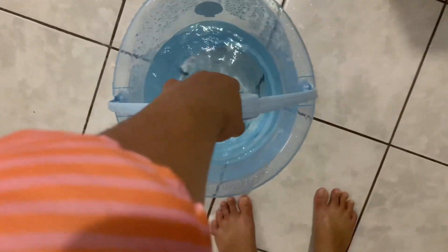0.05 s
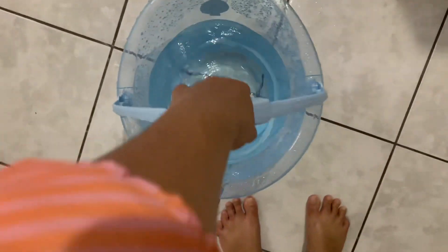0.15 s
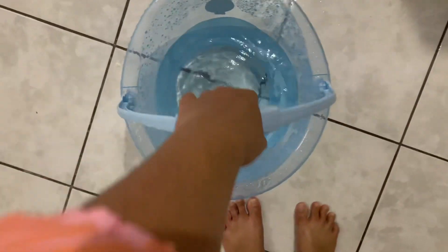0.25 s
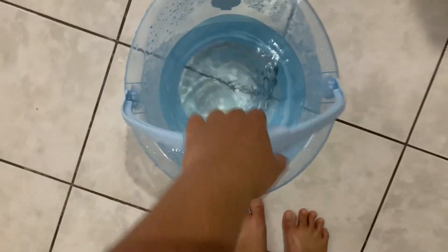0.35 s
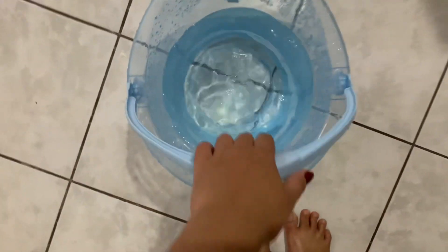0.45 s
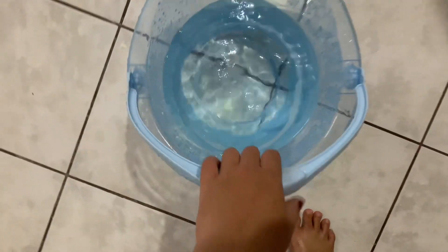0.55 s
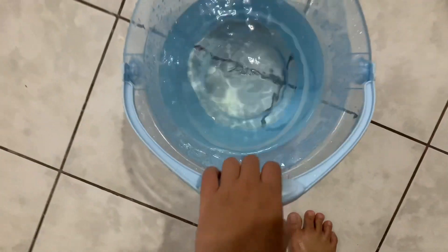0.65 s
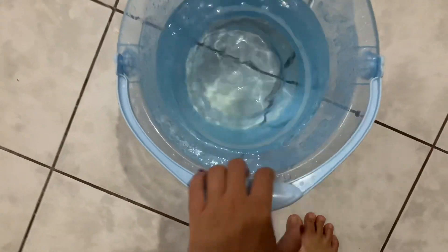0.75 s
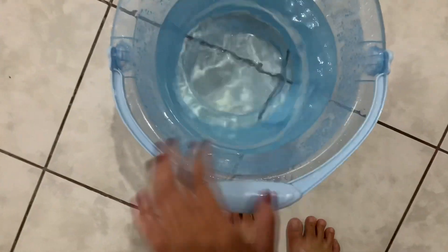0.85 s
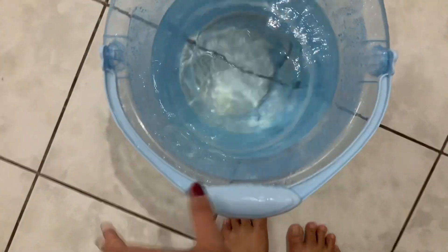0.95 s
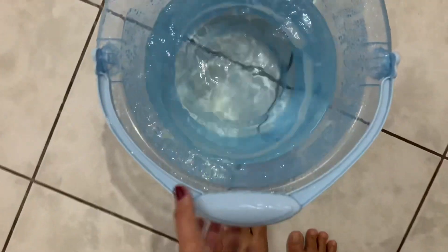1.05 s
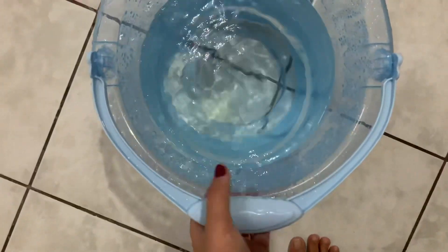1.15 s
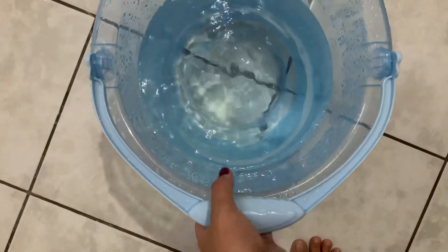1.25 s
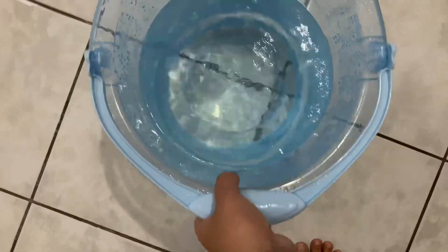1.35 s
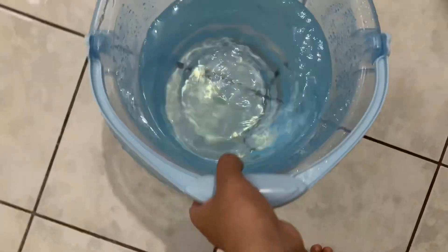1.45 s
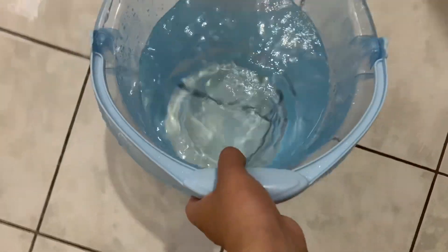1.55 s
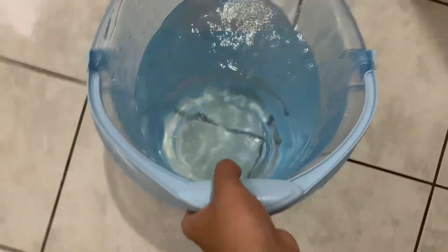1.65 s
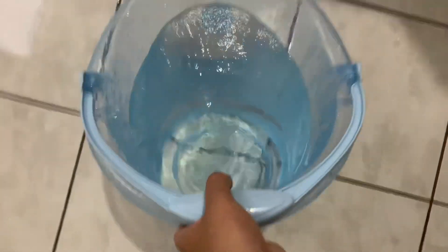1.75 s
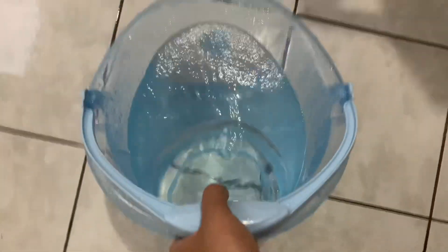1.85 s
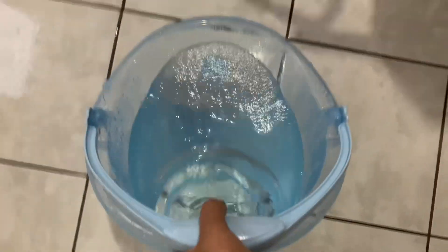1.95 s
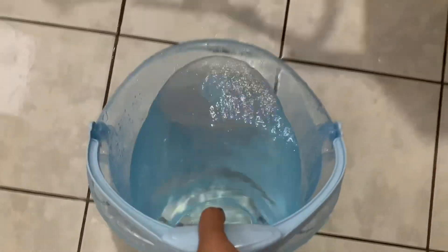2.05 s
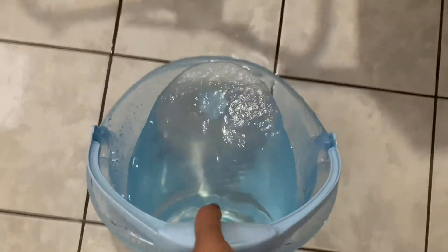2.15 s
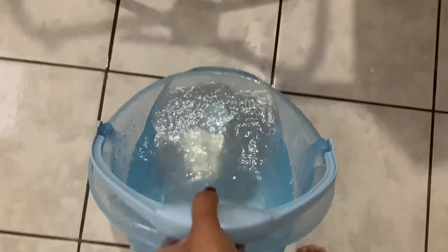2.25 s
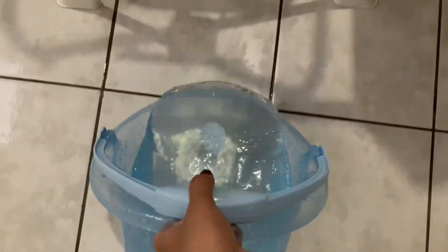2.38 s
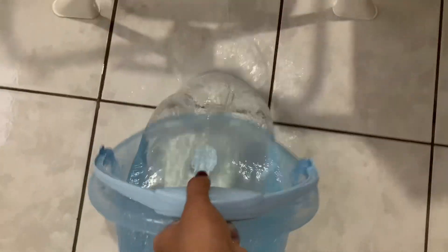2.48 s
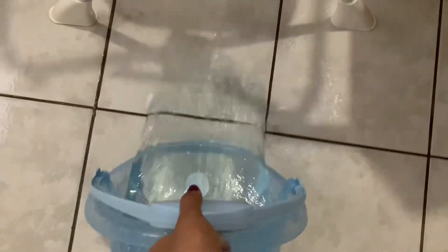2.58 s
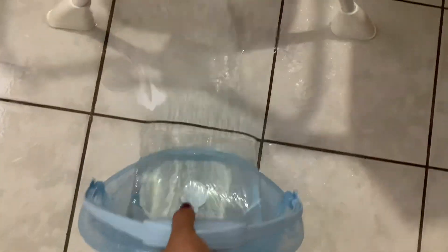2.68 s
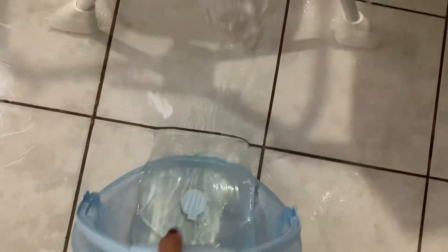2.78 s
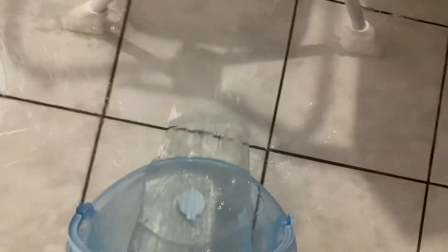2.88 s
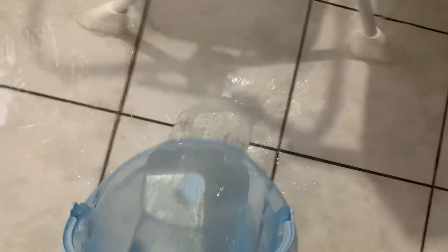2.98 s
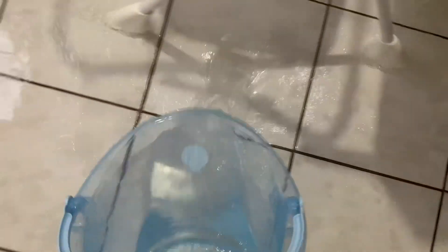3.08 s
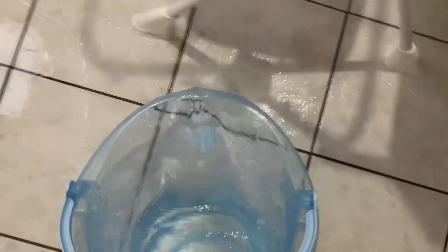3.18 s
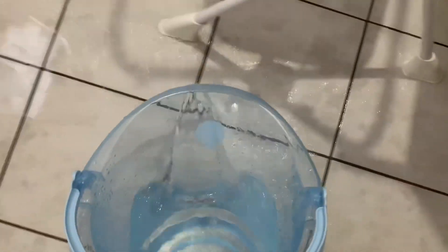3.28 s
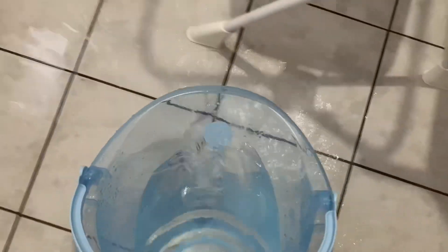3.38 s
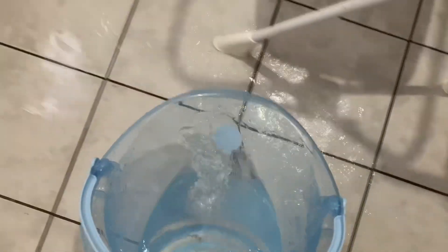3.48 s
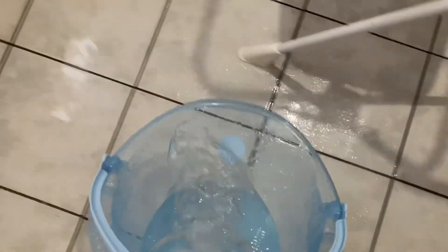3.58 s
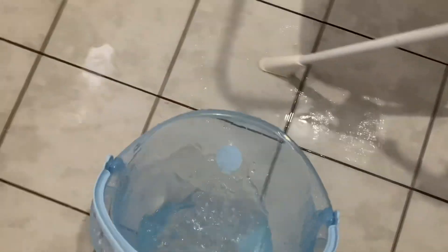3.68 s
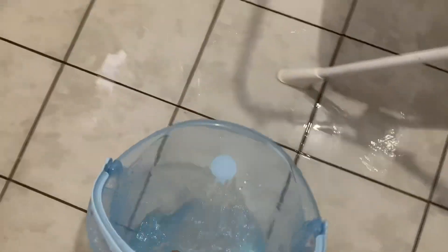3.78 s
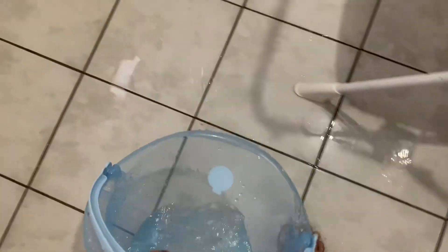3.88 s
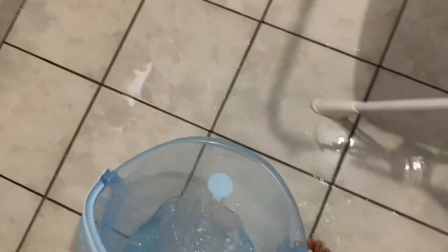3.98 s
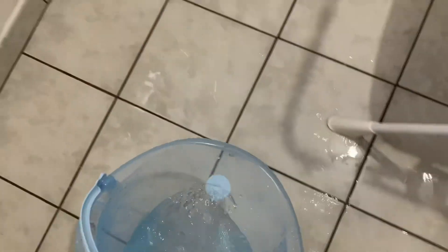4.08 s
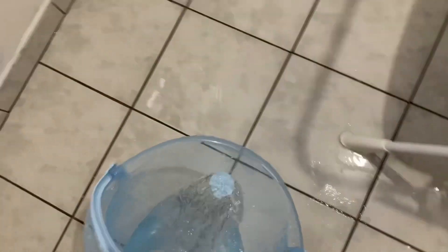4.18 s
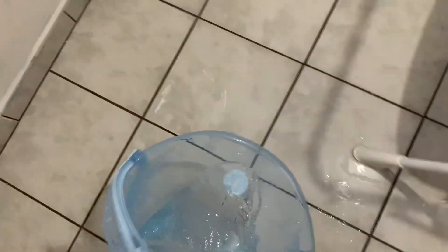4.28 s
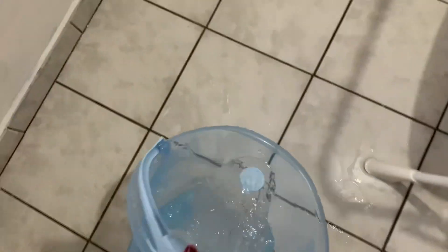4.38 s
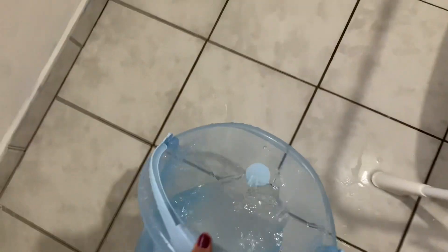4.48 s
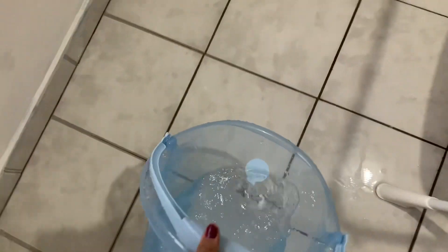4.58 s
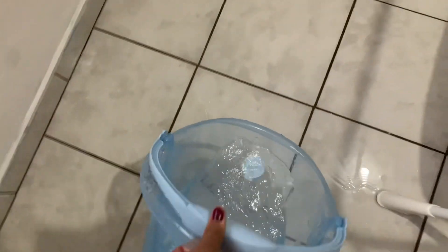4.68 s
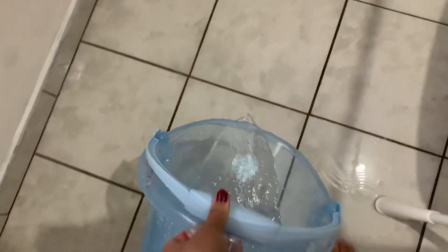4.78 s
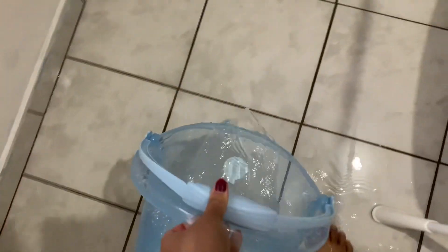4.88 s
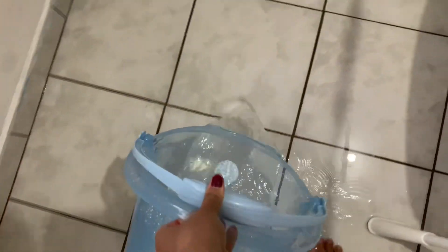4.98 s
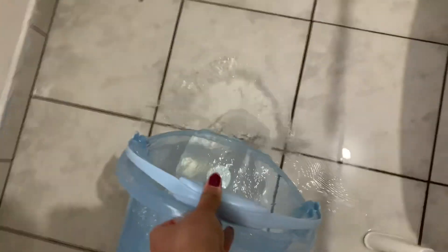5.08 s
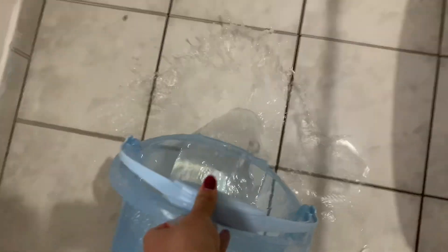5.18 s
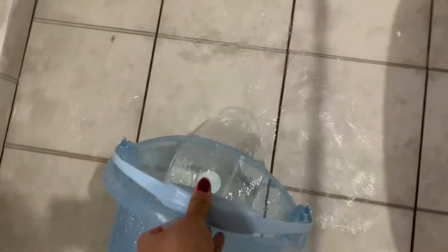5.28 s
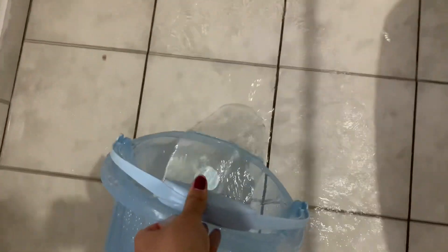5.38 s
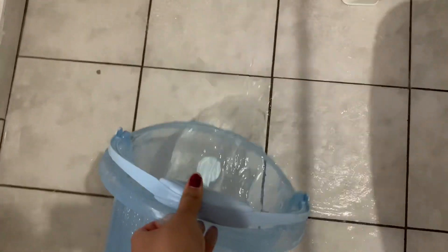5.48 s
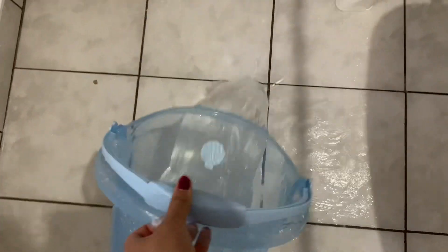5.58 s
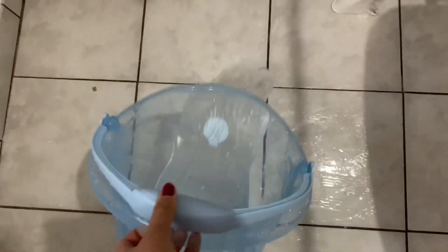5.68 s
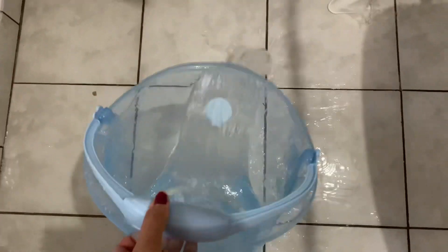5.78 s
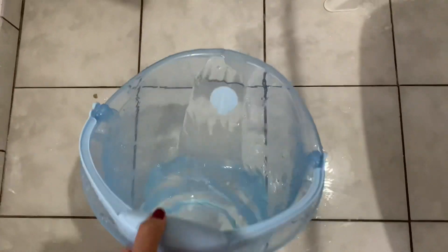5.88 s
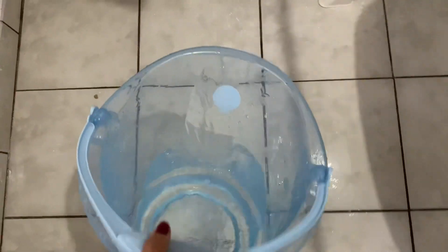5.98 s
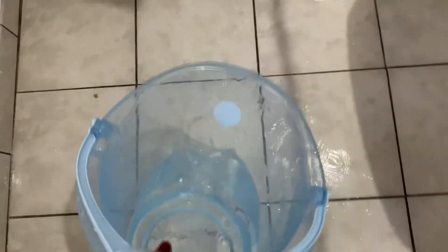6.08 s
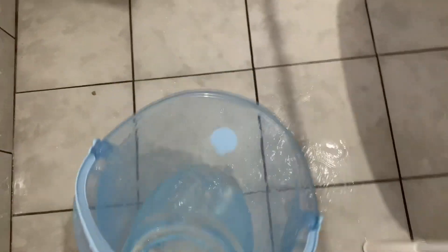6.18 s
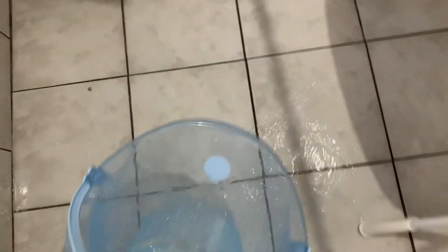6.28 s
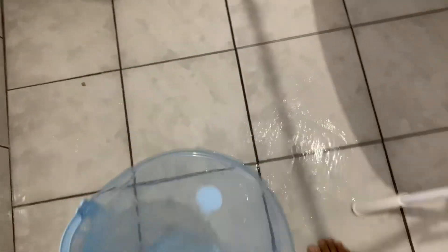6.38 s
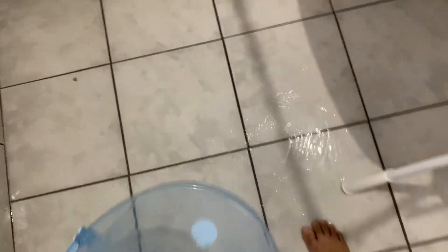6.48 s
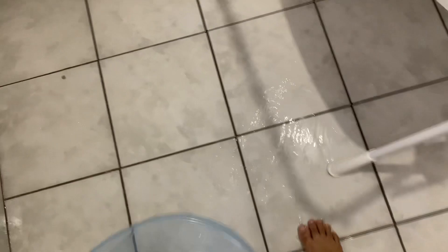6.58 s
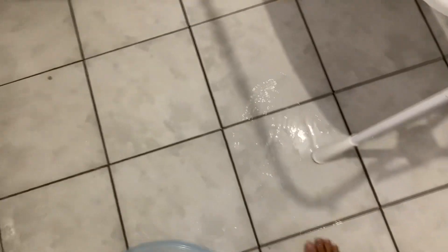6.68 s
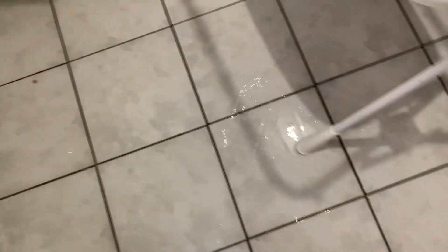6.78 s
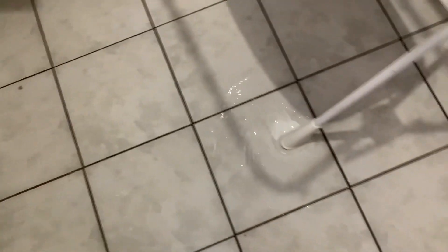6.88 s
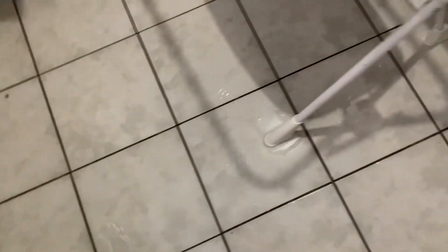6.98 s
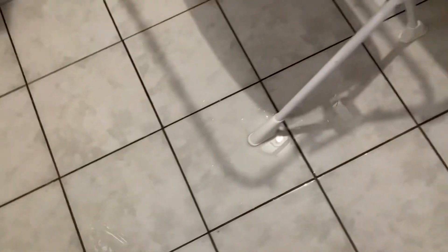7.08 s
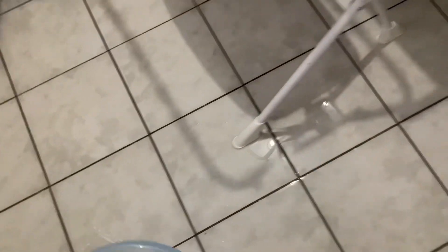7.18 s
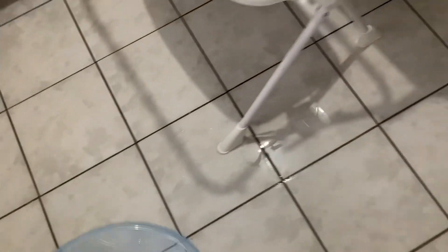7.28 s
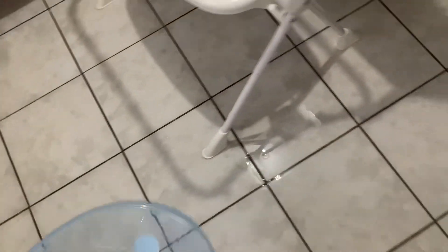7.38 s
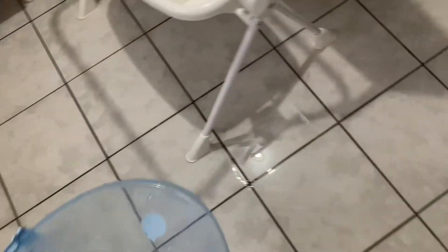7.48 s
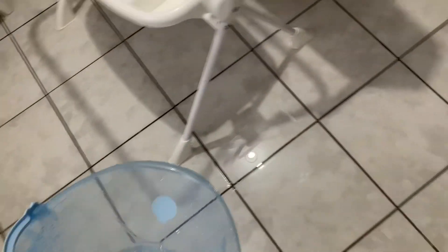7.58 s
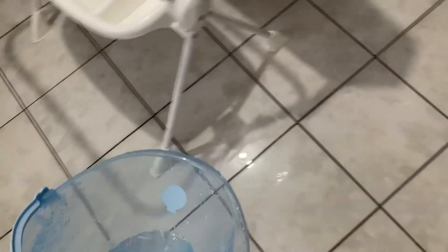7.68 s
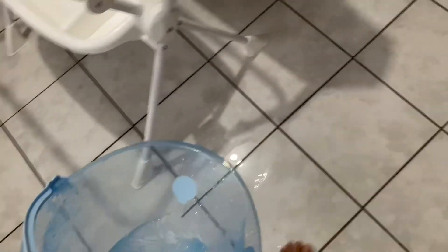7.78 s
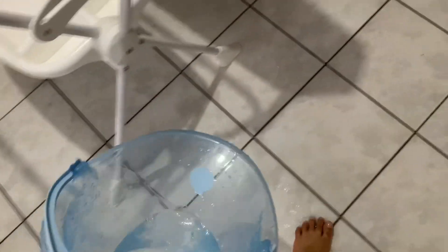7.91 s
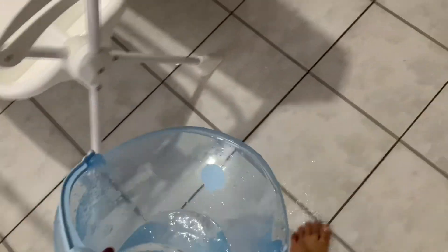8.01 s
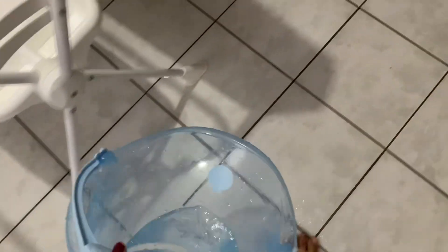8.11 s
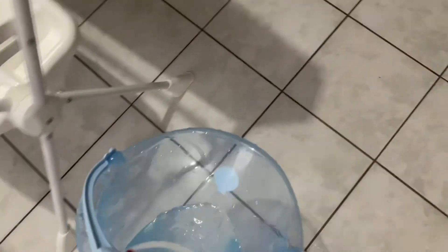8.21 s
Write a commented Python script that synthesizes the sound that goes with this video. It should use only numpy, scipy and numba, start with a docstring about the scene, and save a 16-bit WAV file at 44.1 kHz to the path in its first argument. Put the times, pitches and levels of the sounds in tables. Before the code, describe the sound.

A plastic bucket handle rattles onto the rim, then water is tipped out in bursts, splashing and glugging over hard floor tiles.

```python
"""Water bucket in a tiled room

Place: a plastic bucket of water on wet tiles. Microphone: a phone held close above it, two ports.
The handle is let down and rattles on the rim (damped modes and short clacks); the bucket is tipped twice.
Spills spatter on the tiles (many tiny damped rings), and the rest slops back with deep glugs (rising tones).
Bare feet thud on the floor; behind it all lie low air noise, a faint hum and the ring of the room."""
import sys
import numpy as np
from scipy import signal
from scipy.fft import rfft, irfft
from scipy.io import wavfile
from numba import njit

SR = 44100
rng = np.random.default_rng(int(sys.argv[2]) if len(sys.argv) > 2 else 0)


def generate_wav(signal):
    """Clip the signal to [-1, 1] and save it as 16-bit WAV at the path in sys.argv[1]."""
    frames = np.transpose(np.atleast_2d(signal))
    scaled = np.clip(frames, -1, 1) * 32767
    pcm = np.round(scaled).astype(np.int16)
    wavfile.write(sys.argv[1], SR, pcm)


N = 363825
TIME = np.arange(N) / SR
FREQ = np.fft.rfftfreq(N, 1 / SR)
TOP_HZ = 15900  # the phone passes nothing much above this

# All event and mode levels are relative: each source trims them.
# runs of water over the tiles, two tippings and a last trickle:
# (time [s], length [s], churn [dB], patter [dB], spray [dB], sag [dB/s])
SPILLS = [(2.435, 0.044, -40.5, -50.5, -46.5, -41), (2.526, 0.26, -27.5, -35.5, -37.5, 28),
          (2.807, 0.45, -51, -46.5, -46, 2), (3.24, 0.23, -55, -49, -46, 3.5),
          (3.559, 0.43, -69, -49, -51.5, 9.5), (4.176, 0.025, -75, -49.5, -58.5, -1),
          (4.294, 0.043, -41, -41, -36, 125), (4.676, 0.26, -101.5, -57.5, -55, 48),
          (4.979, 0.1, -72, -54.5, -45.5, -41.5), (5.058, 0.35, -43, -41.5, -38, 13.5),
          (5.425, 0.34, -69, -44.5, -39, 13.5), (5.732, 0.26, -53.5, -43, -38, 3),
          (6.12, 0.016, -37.5, -44, -38.5, 82), (6.273, 0.69, -66.5, -61.5, -66.5, -1.5),
          (6.95, 0.34, -58.5, -55, -70.5, 20), (7.809, 0.052, -76, -60, -57.5, 17.5),
          (7.874, 0.39, -65.5, -65, -85, 0)]
# sizes of bubble in the running stream: (lowest [Hz], highest [Hz], level [dB])
BUBBLES = [(484, 1100, -9), (1105, 1700, -5), (1590, 2600, -4), (2426, 4200, -2.5)]
# colour of the spray: (frequency [Hz], gain [dB])
SPRAY = [(1500, -18), (3000, 4), (4500, -0.5), (7000, 0), (10000, 1.5), (13000, 2), (15500, 4)]
# swarms of bubbles under single gouts: (time [s], length [s], level [dB], pitch [Hz], slide [octaves])
SWARMS = [(2.451, 0.027, -34.5, 2960, 0.43), (2.484, .05, -39, 740, -0.49), (2.553, .06, -29, 2120, -.2),
          (2.597, .05, -28, 1157, 0.62), (2.734, .06, -29, 1350, .2), (2.81, .08, -42, 2160, -0.26),
          (2.858, 0.07, -51, 1210, 0.47), (3.008, 0.032, -34, 2890, -.4), (3.046, .06, -42, 1880, -.7),
          (3.08, 0.037, -34.5, 2960, 0.11), (3.125, .11, -38, 1300, -0.43), (3.246, .045, -34.5, 2780, 0.4),
          (3.42, .09, -39.5, 1650, -0.47), (3.517, 0.082, -38.5, 990, 0.42), (3.642, .06, -36, 2400, 0.41),
          (3.832, .07, -40, 2185, -0.7), (3.745, 0.047, -47, 1580, -0.35), (3.92, .07, -44, 1840, -.3),
          (4.011, 0.089, -44.5, 1140, -0.15), (4.322, .055, -36, 2900, 0.65), (4.72, .03, -43, 2740, 0.26),
          (4.836, .1, -47.5, 2950, -.2), (5.146, .078, -48, 710, 0.17), (5.21, .06, -39, 2380, .3),
          (5.278, 0.068, -42, 710, -0.23), (5.451, .04, -36, 1320, -0.51), (5.528, .04, -28, 3430, -0.17),
          (5.355, .06, -40, 1295, .3), (5.53, .06, -41, 1750, 0.38), (5.634, .08, -37, 1597, -0.53),
          (5.84, .14, -45, 853, 0.36), (5.771, .09, -35, 1440, 0.38), (5.784, .066, -26.5, 2850, -0.31),
          (5.891, .055, -26.5, 3050, -.2), (5.87, .07, -38, 1333, -0.72), (5.936, 0.047, -36, 1370, -.5),
          (5.964, .032, -28.5, 2980, .2), (6.865, 0.097, -51.5, 1940, -.5),
          (6.967, .06, -49.5, 1540, -0.54), (7.042, .16, -57, 1620, .4), (7.763, .056, -51, 1880, -0.36),
          (7.841, .043, -43.5, 2850, .4), (7.897, 0.082, -60, 2210, -0.13), (7.982, .09, -56, 2090, 0.6)]
# single hard drops that crack on the tiles: (time [s], level [dB])
SPITS = [(2.415, -39), (2.54, -35), (2.6707, -14.5), (2.767, -18.5), (2.783, -22), (2.8022, -14),
         (3.338, -24), (3.837, -16), (4.192, -40), (4.701, -37), (4.986, -16), (5.086, -14.5),
         (5.455, -29.5), (5.911, -12), (6.092, -16), (6.2833, -25), (6.412, -31), (6.478, -38)]
# slaps of water on plastic and tile, and from 1.758 to 2.03 s short noisy bursts as the handle creaks in its
# hinges: (time [s], level [dB], pitch [Hz], decay [s])
SLAPS = [(1.758, -55, 2500, 0.011), (1.762, -47, 1520, 0.047), (1.762, -39, 635, 0.0098),
         (2.03, -46.5, 2490, 0.0083), (2.539, -20, 706, 0.033), (2.54, -26.5, 1570, 0.035),
         (2.591, -24, 1060, 0.019), (2.716, -10.5, 1450, 0.0051), (2.743, -25, 1080, 0.0072),
         (3.3712, -22, 1010, 0.0016), (3.371, -16.5, 2300, 0.0014), (3.410, -21.5, 1830, 0.0054),
         (3.428, -42, 960, 0.075), (3.537, -30, 726, 0.017), (3.636, -36, 8200, 0.0039),
         (3.834, -34.5, 9200, 0.038), (4.082, -33, 880, 0.0069), (4.1938, -15, 4300, 0.00071),
         (4.194, -23, 6700, 0.00098), (4.193, -37.5, 6000, 0.035), (4.294, -19.5, 790, 0.0021),
         (4.314, -35.5, 3820, 0.033), (4.392, -18, 1200, 0.0035), (4.392, -23.5, 2480, 0.0034),
         (6.054, -28, 2340, 0.0062), (6.14, -19.5, 710, 0.0054), (6.142, -20.5, 1330, 0.0061),
         (6.146, -17, 2470, 0.0017), (6.205, -28.5, 1050, 0.0079), (6.867, -36, 4500, 0.0016),
         (7.02, -40, 1050, 0.0038), (7.032, -42, 5700, 0.0045), (7.034, -49, 6050, 0.037),
         (7.756, -50, 2960, 0.042), (7.844, -42.5, 4420, 0.015)]
# the few bubbles that ring out above the patter: (time [s], level [dB], pitch [Hz])
PLINKS = [(3.120, -31.5, 1596), (3.411, -29, 1710), (3.416, -30, 1530), (3.430, -32.5, 855),
          (3.475, -39, 1320), (3.528, -39, 1570), (3.553, -47, 1100), (3.718, -31.5, 3640),
          (3.757, -39, 1530), (3.8435, -35.5, 1910), (3.9, -37, 1600), (3.980, -34.5, 1790),
          (4.3198, -34, 1770), (4.652, -41.5, 1544), (4.748, -41, 2830), (5.320, -37, 634),
          (5.363, -34, 1154), (5.468, -33, 1340), (5.5397, -30, 1810), (5.548, -29.5, 1950),
          (5.8677, -23, 1650), (5.917, -29, 1177), (5.9653, -34.5, 984), (6.09, -35.5, 1064),
          (7.052, -42.5, 2020), (7.7858, -43, 1580), (7.756, -36.5, 3900), (7.853, -48, 1850),
          (8.026, -51, 2500)]
# dull thuds of the water's weight and of bare feet: (time [s], level [dB], pitch [Hz], t60 [s])
THUDS = [(2.598, -34.5, 137.7, 0.23), (2.625, -31, 85, 0.12), (2.944, -34.5, 140, 0.092),
         (4.398, -29.5, 157, 0.066), (6.064, -48, 131, 0.13), (6.869, -47, 139.2, 0.72),
         (7.447, -40, 83.6, 0.067), (7.498, -37, 68, 0.06), (7.514, -45, 45, .12)]
# air pockets that close in the bucket: (time [s], pitch [Hz], level [dB], t60 [s], swell [s])
GLUGS = [(.005, 349.4, -43.5, 0.19, .005), (.012, 192, -34.5, 0.04, .0023),
         (1.318, 230, -25.5, 0.025, .004), (2.513, 326, -31, .064, .003), (2.539, 556, -14, 0.032, .0045),
         (2.589, 297, -22.5, 0.076, .004), (2.718, 452, -19, .07, .002), (2.722, 322, -21, .05, .008),
         (2.742, 330, -17.5, 0.022, .003), (2.933, 344, -18, 0.026, .012), (2.961, 294, -22, 0.049, .004),
         (2.98, 319, -27, 0.13, .006), (3.257, 343, -33, 0.037, .003), (3.372, 286, -15, 0.025, .0065),
         (3.416, 210, -26.5, 0.04, .007), (3.548, 314, -34.5, .089, .005),
         (4.036, 290, -34.5, 0.075, .0012), (4.085, 313, -34, 0.054, .0026),
         (4.297, 297, -30, 0.052, .0014), (4.393, 670, -19, 0.027, .001), (4.393, 323, -16.5, 0.095, .0023),
         (5.735, 730, -36.5, 0.035, .0017), (6.056, 297, -19.5, 0.074, .013),
         (6.142, 284, -25.5, 0.042, .005), (6.205, 308, -29.5, 0.021, .002), (7.025, 265, -43, 0.1, .0046),
         (7.561, 282, -43.5, 0.026, .003), (8.119, 256, -41, .07, .0026)]
# clacks of the handle: (time [s], level [dB], pitch [Hz], contact [s])
CLACKS = [(.316, -48.5, 1430, 0.0019), (0.337, -52, 1315, 0.0048), (.506, -42, 1440, 0.0015),
          (.5555, -31.5, 1470, 0.0011), (0.643, -33, 1600, 0.0023), (.649, -27, 1590, 0.003),
          (0.6521, -18, 1047, 0.0021), (0.6552, -12, 1460, 0.00093), (.792, -26.5, 1660, 0.00081),
          (0.831, -20.5, 1550, 0.00096), (.839, -9.5, 1250, .0012), (0.8441, -3.5, 1590, 0.00091),
          (0.8505, -11, 1880, 0.001), (0.8571, -1.5, 1800, 0.0009), (0.865, -12, 1620, 0.0015),
          (.8725, -15, 1450, 0.0013), (.936, -15, 1320, 0.00094), (.949, -6, 1780, 0.0013),
          (.956, -8.5, 1610, 0.0016), (.992, -20, 1370, 0.0012), (1.005, -20.5, 1690, 0.0015),
          (1.012, -17.5, 1590, 0.00078), (1.028, -11.5, 1520, 0.0012), (1.044, -19.5, 1593, .002),
          (1.16, -24.5, 1900, 0.00046), (1.759, -34.5, 2250, 0.001), (1.7616, -30, 1250, 0.0014),
          (2.032, -27, 1040, 0.00099), (2.048, -33.5, 1147, 0.0016), (8.118, -44.5, 1400, 0.0011)]
# blows on the bucket: (time [s], body level [dB], sharp tick level [dB], scrape decay [s])
KNOCKS = [(.317, -42.5, -90, .014), (.502, -35.5, -71.5, .003), (.552, -41, -78.5, .001),
          (.648, -19, -47.5, .004), (.838, -11, -11.5, .001), (.842, -13, -38, .001),
          (.869, -18.5, -44, .001), (.9355, -11.5, -17, .001), (.948, -32, -27.5, .001),
          (.9905, -18, -18, .001), (1.003, -28, -48, .001), (1.022, -21, -52, .001),
          (1.132, -31, -66, .0043), (1.253, -45, -53, .001), (1.759, -40, -80, .004),
          (2.03, -33, -68, .008), (8.116, -41.5, -80, .0034)]
# modes of the handle and rim, before jitter: (frequency [Hz], level [dB], t60 [s])
HANDLE = [(976, -8, .055), (1185, -14.5, .044), (1490, -3.5, 0.009), (1420, -2.5, 0.0063),
          (1500, -15.5, 0.025), (1645, 3, 0.025), (1685, -14, 0.0064), (1910, -3.5, 0.012),
          (2140, -16.5, 0.038), (2880, -6.5, 0.0079), (3100, -11.5, 0.014), (2400, -12.5, .04),
          (3570, -19, .05), (3940, -18, .052)]
# modes of the bucket's wall and base, before jitter: (frequency [Hz], level [dB], t60 [s])
BODY = [(84, -18, 0.12), (118, -10.5, 0.071), (166, -12, .059), (212, -9.5, .077), (256, -6, 0.11),
        (281.7, -4, 0.089), (341.5, -1, 0.077), (391, -2.5, .05), (470, 0.5, 0.054), (595, 2.5, 0.041),
        (756, -4.5, 0.046)]
# waves that run up the bucket's wall: (time of the crest [s], level [dB])
WAVES = [(0, -53.5), (.62, -60), (1.101, -53.5), (1.469, -51), (1.7, -69.5), (2.301, -61), (2.39, -54),
         (2.5, -49.5)]
# colour of the still room: (frequency [Hz], relative level per Hz [dB])
AIR = [(20, -58.5), (33, -2), (48, 3.5), (85, -4.5), (150, -7.5), (300, -9.5), (450, -14), (800, -20.5),
       (1600, -28.5), (3000, -25), (5000, -31.5), (9000, -40.5), (16000, -40)]
# faint hum of the room: (frequency [Hz], level [dB])
HUM = [(47.5, -74), (100, -74.5), (137, -65), (199, -72), (299, -68)]
# ring of the tiled room: (frequency [Hz], t60 [s], strength [dB])
ROOM = [(101, 0.8, -1.5), (288, 0.61, 4), (700, 0.53, 0), (2010, 0.52, -0.5), (5000, 0.64, 1),
        (9000, 0.35, -0.5), (16000, 0.13, -0.5)]
# phase between the two microphone channels: (frequency [Hz], phase [half turns])
PORTS = [(0, .05), (250, .18), (700, .42), (1100, .31), (1800, .31), (2500, .5), (3700, .58), (4600, .97),
         (4900, 1.03), (6500, 1.95), (7300, 2.05), (8600, 2.95), (9200, 3.05), (10600, 3.95), (11300, 4.05),
         (12800, 4.95), (13500, 5.05), (14900, 5.95), (16000, 6.05)]


def pour(clump_db=2.5, foam=0.47, shift_db=3.5):
    """The stream breaks on the tiles in gouts: large bubbles, pattering drops and a fine crackle of spray."""
    _, _, churns, patters, sprays, _ = np.transpose(SPILLS)
    gouts = clump_db * walk(28)
    # churn and patter build over a share of each spill's length, so they lag the spray
    churn_db = spill_level(churns, rise_share=0.192) + gouts
    patter_db = spill_level(patters, rise_share=0.17) + gouts
    spray_db = spill_level(sprays) + gouts / 2
    # only a strong stream drags air under; a thin film just hisses as it spreads
    bubble_db = patter_db + foam * np.minimum(patter_db + 37.5, 0)

    drumming = drops(churn_db, 75, 330, rate=47, cycles=8, glide=0, spread_db=5, thinning=0.054)
    drone = undb(patter_db) * unit(band(rng.standard_normal(N), 47.5, 95))
    churn = drops(churn_db, 380, 1100, rate=420, cycles=11, glide=0.2, spread_db=2, thinning=0.24)
    # each size of bubble comes and goes on its own, so the colour of the pour keeps shifting
    bubbles = np.zeros(N)
    for lo_hz, hi_hz, db in BUBBLES:
        flow_db = bubble_db + shift_db * walk(22)
        bubbles += undb(db) * drops(flow_db, lo_hz, hi_hz, rate=lo_hz / 5, cycles=1.1 * np.sqrt(lo_hz),
                                    glide=0.28, spread_db=3.8, thinning=0.2)
    patter = drops(patter_db, 950, 5200, rate=700, cycles=4, glide=0.05, spread_db=5.2, thinning=0.18)
    spray = drops(spray_db, 3800, 21000, rate=3000, cycles=1.4, glide=0.036, spread_db=-1.5, thinning=0.13)
    fizz = drops(spray_db, 3800, 14000, rate=800, cycles=45, glide=0.08, spread_db=3.6, thinning=0.25)

    deep = undb(-11.5) * drumming + undb(-14) * drone + undb(-8) * churn
    bright = undb(-7.5) * patter + undb(-2.5) * colour(spray, SPRAY) + undb(-3) * fizz
    return deep + bubbles + bright


def spill_level(levels, rise_share=0, attack_s=0.012, release_db_per_s=155):
    """Level in dB of all spills together: each rises, sags while it runs, then dies away."""
    power = np.zeros(N)
    for (s, length, *_, sag), db in zip(SPILLS, levels):
        age = np.maximum(TIME - s, 0)
        attack = np.minimum(age / (attack_s + rise_share * length), 1)
        sagged = db - sag * np.minimum(age, length)
        released = sagged - release_db_per_s * np.maximum(age - length, 0)
        power += (attack * undb(released)) ** 2
    return 10 * np.log10(power + 1e-10)


def swarms(swarm_db=1.5, size_spread=0.218, cycles=42, glide=0.29, count=17):
    """A gout drags air under: like-sized bubbles chirp upwards while the whole swarm slides in pitch."""
    out = np.zeros(N)
    for s, length, db, centre_hz, slide in SWARMS:
        when, size, softness = rng.random((3, count))
        progress = (np.arange(count) + when) / count
        start = ((s + length * progress) * SR).astype(np.int64)
        hz = centre_hz * 2 ** (slide * (progress - 0.5)) * np.exp(size_spread * (2 * size - 1))
        gain = undb(db + swarm_db - 10 * softness)
        out += grains(start, hz, cycles * (0.5 + softness), gain, float(glide))  # softer ones ring longer
    return out


def spits(spit_db=-1):
    """Each hard drop is one short, bright crack of noise."""
    out, t = np.zeros(N), TIME[:SR // 200]
    snap = np.exp(-t / 0.0004)
    for s, db in SPITS:
        crack = band(rng.standard_normal(len(t)) * snap, 7800, 0.45 * SR)
        add(out, s, undb(db + spit_db) * crack / np.abs(crack).max())
    return out


def slop(slap_db=-4, plink_db=0, thud_db=-2, plink_cycles=60):
    """Waves fold over in slaps of decaying noise (the handle's hinges creak in a few such bursts too), with
    single ringing bubbles and dull falling thuds."""
    out, t = np.zeros(N), TIME[:SR // 6]
    for s, db, hz, decay in SLAPS:
        top_hz = 1.232 * hz
        spatter = unit(band(rng.standard_normal(len(t)), top_hz / 2, top_hz))  # one octave
        add(out, s, undb(db + slap_db) * spatter * np.exp(-t / decay))
    for s, db, hz in PLINKS:
        add(out, s, undb(db + plink_db) * bubble(hz, plink_cycles / hz, swell=0.00044, glide=0.22))
    for s, db, hz, t60 in THUDS:
        add(out, s, undb(db + thud_db) * bubble(hz, t60, swell=0.0054, glide=-0.2))
    return out


def glugs(glug_db=-0.74, glide=0.08):
    """Large pockets of air close and ring as one deep, clean tone each."""
    out = np.zeros(N)
    for s, hz, db, t60, swell in GLUGS:
        add(out, s, undb(db + glug_db) * bubble(hz, t60, swell, glide))
    return out


def handle(clack_db=-2.5, ring_db=-15, body_db=-3, tick_db=-2, rasp_db=-11, scrape_s=0.0032):
    """The handle clacks in its hinges and on the rim; blows also boom in the bucket and tick."""
    out, t = np.zeros(N), TIME[:SR // 20]
    for s, db, hz, contact in CLACKS:
        add(out, s - 3 * contact, undb(db + clack_db) * clack(hz, contact))  # its peak falls at s
        add(out, s, undb(db + ring_db) * strike(HANDLE, scrape_s))
        rasp = band(rng.standard_normal(len(t)) * np.exp(-t / 0.007), hz / 1.9, hz * 2.37, order=4)
        add(out, s, undb(db + rasp_db) * rasp)
    for s, body, tick, scrape in KNOCKS:
        add(out, s, undb(body + body_db) * strike(BODY, scrape))
        snap = rng.standard_normal(len(t)) * np.exp(-t / 0.0018)
        add(out, s, undb(tick + tick_db) * band(snap, 2800, 15000))
    return out


def clack(hz, contact):
    """Well-damped plastic flexes for a few cycles, swelling and fading with the contact; peak 1."""
    t = TIME[:int(6 * contact * SR)] - 3 * contact
    return np.exp(-(t / contact) ** 2) * np.cos(2 * np.pi * hz * t)


def strike(modes, scrape, jitter=0.037, chatter=0.49, place_db=2.5):
    """A blow and a short scrape of tiny catches excite the modes, differently at each place; peak 1."""
    t = TIME[:SR // 4]
    push = chatter * rng.standard_normal(len(t)) * np.exp(-t / scrape) * np.sqrt(scrape * 10)
    push[0] += 1
    ring = np.zeros(len(t))
    for hz, db, t60 in modes:
        gain = undb(db + place_db * rng.standard_normal())
        mode_hz = hz * (1 + jitter * rng.standard_normal())
        ring += gain * np.exp(-np.log(1000) * t / t60) * np.sin(2 * np.pi * mode_hz * t)
    # soft plastic takes a cycle or two of its middle mode to get moving
    middle_hz = modes[len(modes) // 2][0]
    ring = ring * (1 - np.exp(-(t * middle_hz / 0.98) ** 2))
    x = signal.fftconvolve(ring, push)[:len(t)]
    return x / np.abs(x).max()


def sway(rise_db_per_s=88.5, fall_db_per_s=154.5, ripple_db=-78):
    """Ripples lap at the bucket's wall, swelling towards the crest of each wave."""
    levels = [db - np.maximum(rise_db_per_s * (s - TIME), fall_db_per_s * (TIME - s)) for s, db in WAVES]
    # faint ripples last until the first spill
    levels.append(np.where(TIME < SPILLS[0][0], ripple_db, -100))
    db = np.max(levels, axis=0)
    swell = drops(db, 320, 800, rate=660, cycles=14, glide=0.065, spread_db=4.5, thinning=0.24)
    ripples = drops(db, 1100, 2500, rate=630, cycles=25, glide=0.1, spread_db=1.5, thinning=0.1)
    # the hollow of the bucket picks out one octave of each
    hollow = undb(-4) * band(swell, 235, 470) + undb(-9) * band(ripples, 880, 1760)
    return undb(2) * swell + undb(-3) * ripples + hollow


def still_room(air_db=-58.5, hum_db=-1, waver_db=5.5, drift_db=1.0):
    """Low drifting air noise and a faint hum whose tones waver in level."""
    out = undb(air_db + drift_db * walk(2.2)) * unit(colour(rng.standard_normal(N), AIR))
    for hz, db in HUM:
        out += undb(db + hum_db + waver_db * walk(4.6)) * np.sin(2 * np.pi * hz * TIME)
    return out


def tiles(x, wet_db=-4, early_db=5, early_s=0.023, gap_s=0.0036):
    """A strong early return from floor and walls, then the ring of a hard room: noise decaying by band."""
    t, f = TIME[:SR], np.arange(SR // 2 + 1)
    noise = rfft(rng.standard_normal(SR)) * undb(lookup(f, ROOM, axis=2))
    edges = np.r_[0, np.geomspace(150, 12000, num=8), SR]
    tail = np.zeros(SR)
    for lo, hi in zip(edges, edges[1:]):
        t60 = lookup(min((lo + hi) / 2, TOP_HZ), ROOM)
        tail += irfft(noise * (f >= lo) * (f < hi), SR) * np.exp(-np.log(1000) * t / t60)
    tail = tail * (t > gap_s) * (1 + undb(early_db) * np.exp(-t / early_s))
    return undb(wet_db) * signal.fftconvolve(x, tail / np.sqrt(np.sum(tail ** 2)))[:N]


def microphones(front, across):
    """Two close ports: the bass is alike in both, the treble swings in and out of phase."""
    angle = np.pi / 2 * np.interp(FREQ, *np.transpose(PORTS))
    mid = irfft(rfft(front) * np.cos(angle), N)
    side = irfft(rfft(across) * 1j * np.sin(angle), N)
    return np.array([mid + side, mid - side])


def bubble(hz, t60, swell, glide):
    """A pocket of air rings, its pitch rising as it nears the surface (falling if glide < 0); peak 1."""
    t = TIME[:int(1.3 * t60 * SR)]
    envelope = (1 - np.exp(-(t / swell) ** 2)) * np.exp(-np.log(1000) * t / t60)
    pitch = hz * (1 + glide * (t - 2 * swell) / t60)
    return envelope / envelope.max() * np.sin(2 * np.pi * np.cumsum(pitch) / SR)


def drops(db, lo_hz, hi_hz, rate, cycles, glide, spread_db, thinning):
    """Random drops, at most rate per s, follow a level curve: a weaker flow gives fewer and smaller ones."""
    u = rng.random((int(rate * N / SR), 5))
    start = (u[:, 0] * (N - 1)).astype(np.int64)
    share = undb(thinning * (db[start] - db.max()))  # chance that a drop falls
    hz = lo_hz * (hi_hz / lo_hz) ** u[:, 1]
    rings = cycles * (0.5 + u[:, 2])
    size = undb(-spread_db * np.log(0.015 + u[:, 3])) * np.sign(u[:, 2] - 0.5)
    # level the sum, whatever the number of drops and their length
    energy = np.sum(size ** 2 * rings / hz) * SR / 56 / N
    size = size * undb(db[start]) / np.sqrt(share * energy)
    kept = u[:, 4] < share
    return grains(start[kept], hz[kept], rings[kept], size[kept], float(glide))


@njit
def grains(start, hz, cycles, size, glide):
    """Sum of tiny damped rings, each swelling quickly, then dying within its cycles as its pitch glides."""
    out = np.zeros(N)
    for k in range(len(start)):
        length = int(cycles[k] * SR / hz[k]) + 2
        step = 2 * np.pi * hz[k] / SR
        z = size[k] + 0j
        turn = np.exp(1j * step - 6 / length)
        bend = np.exp(1j * step * glide / length)
        for i in range(start[k], min(start[k] + length, N)):
            z *= turn
            turn *= bend
            out[i] += z.imag * min(1., 9 * (i - start[k] + 1) / length)
    return out


def walk(rate):
    """Random levels, rate per second, joined by straight lines."""
    knots = np.arange(int(rate * N / SR) + 2) / rate
    return np.interp(TIME, knots, rng.standard_normal(len(knots)))


def undb(db):
    """Decibels to gain."""
    return 10 ** (np.asarray(db) / 20)


def unit(x):
    """Scale to rms 1."""
    return x / np.sqrt(np.mean(x ** 2) + 1e-20)


def add(out, s, x):
    """Mix x into out from time s."""
    i = int(np.clip(s * SR, 0, N - 1))
    out[i:i + len(x)] += x[:N - i]


def lookup(hz, points, axis=1):
    """Read one column of a (frequency [Hz], ..) table on a log-frequency axis."""
    columns = np.transpose(points)
    return np.interp(np.log(np.maximum(hz, 1)), np.log(columns[0]), columns[axis])


def colour(x, points):
    """Filter by a (frequency [Hz], gain [dB]) spectrum."""
    return irfft(rfft(x) * undb(lookup(FREQ, points)), N)


def band(x, lo_hz, hi_hz, order=2):
    """Causal band-pass."""
    return signal.sosfilt(signal.butter(order, [lo_hz, hi_hz], "band", fs=SR, output="sos"), x)


def scene():
    """Bucket and water lie straight ahead of the ports, close by; the room answers from all round."""
    plastic, pockets = handle(), glugs()
    water = slop() + pour() + swarms() + spits() + sway()
    near = plastic + pockets + water
    # the rim and glugs are nearer than the floor, so they carry less of the room
    spread = undb(-2.5) * plastic + undb(-4) * pockets + water
    front = near + tiles(spread) + still_room()
    # from the sides: recoloured direct sound, another echo and other air
    side_colour = [(300, -5.5), (1100, 1.5), (1900, 2.5), (3500, -5.5), (5000, 0.5)]
    across = colour(near, side_colour) + tiles(spread) + still_room()
    return microphones(front, across)


def record(dry):
    """The phone cuts the deepest rumble and the top."""
    dry = signal.sosfilt(signal.butter(4, 38, "high", fs=SR, output="sos"), dry)
    return signal.sosfilt(signal.ellip(10, 0.2, 80, TOP_HZ, fs=SR, output="sos"), dry)


dry = scene()
out = record(dry)
generate_wav(out)
```